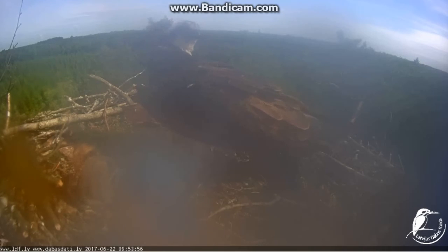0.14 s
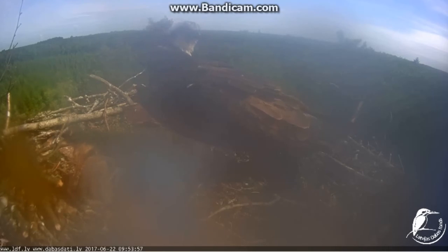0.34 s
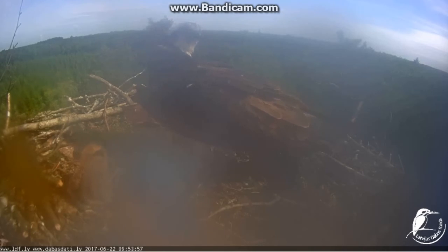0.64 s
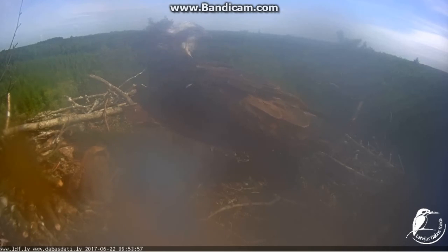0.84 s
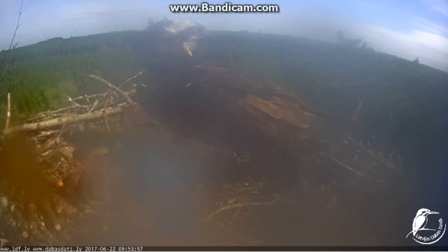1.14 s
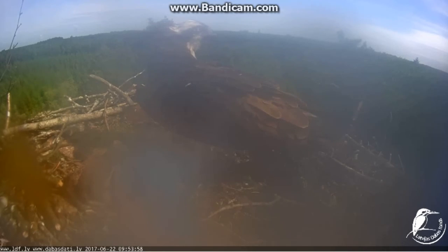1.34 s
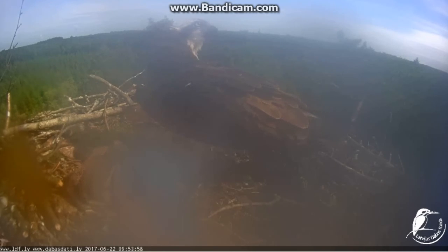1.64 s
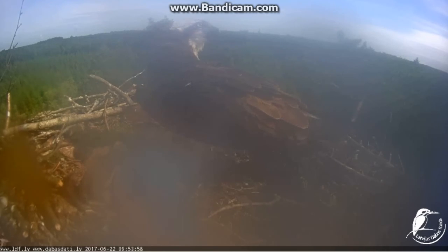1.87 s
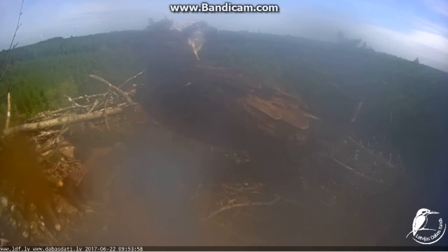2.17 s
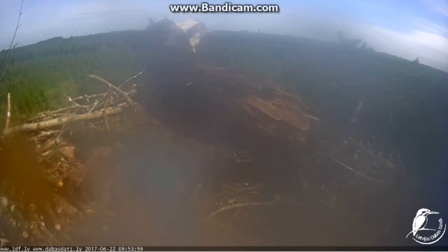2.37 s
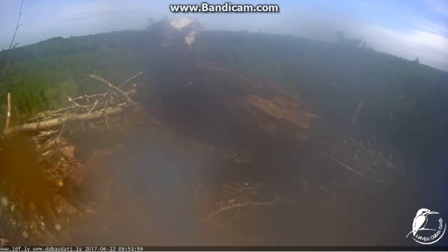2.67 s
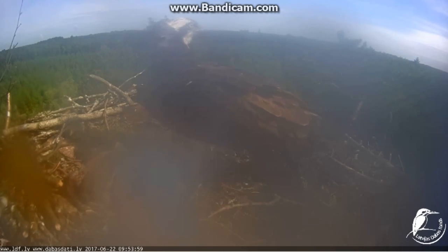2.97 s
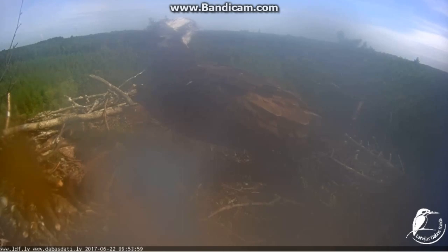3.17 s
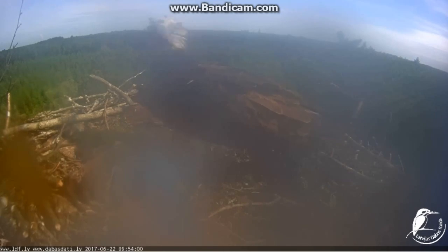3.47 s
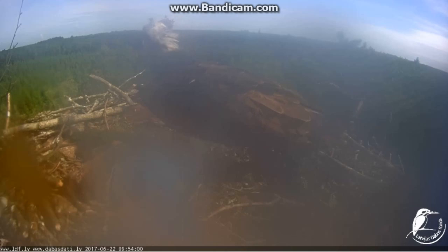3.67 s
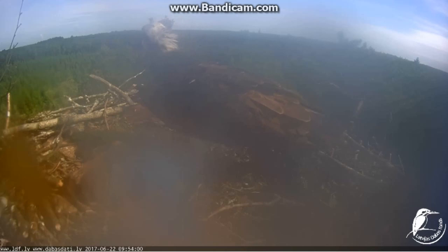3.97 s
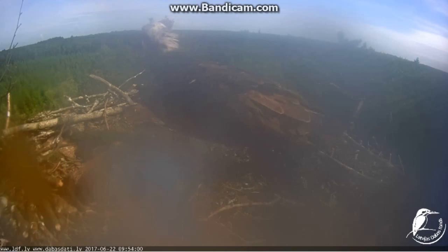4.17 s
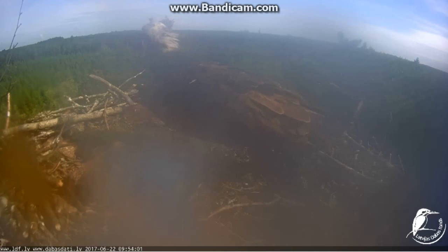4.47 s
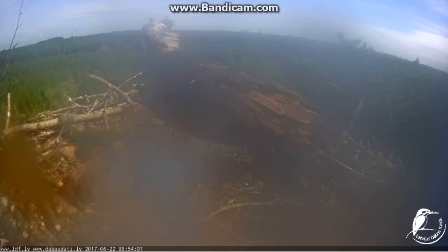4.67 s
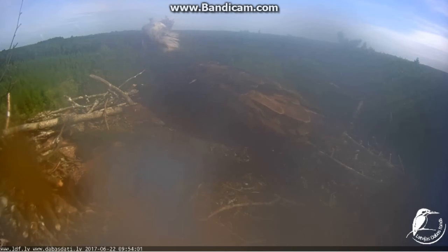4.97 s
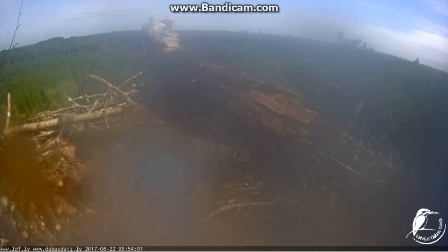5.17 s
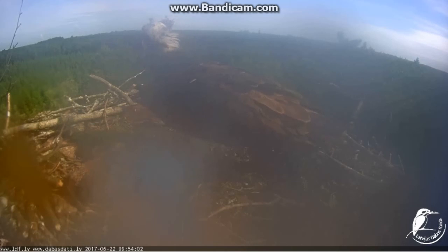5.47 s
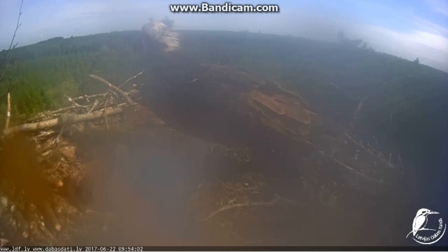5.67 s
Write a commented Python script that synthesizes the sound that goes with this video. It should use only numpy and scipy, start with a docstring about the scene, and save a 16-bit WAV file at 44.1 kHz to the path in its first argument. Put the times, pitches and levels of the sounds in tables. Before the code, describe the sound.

A quiet forest is heard from an outdoor microphone high in the trees. Light wind rumbles on it throughout, over distant air, a faint low hum and a steady hiss. Small gusts swell at about 0.6, 1.3, 3.4 and 4.1 seconds. The songbirds are faint and echo softly among the trees. One opens with four high falling sweeps in the first 0.6 seconds, then five quick chips up to 1.2 seconds. Short slurred whistles and a buzz follow, with thin, very high downward flicks from a farther bird between 2 and 3 seconds. From about 2.8 to 4.3 seconds the song thickens into overlapping twitters, whistles and brief trills, ending in lower buzzy notes around 4.7 seconds. The wind then eases, and a very faint high sizzle rises in the hiss until the end, near 5.8 seconds.

```python
"""A high nest in a forest, heard by an outdoor camera, with small songbirds singing around it.
Each note is one frequency-modulated tone: a whistle, a sweep or a fast trill. Nearby branches
reflect it, and scattering among the trees returns it as a soft echo. Light wind rumbles as its
eddies press on the microphone, over distant air, a low hum and the camera's steady hiss."""
import sys
import numpy as np
from scipy import signal
from scipy.fft import rfft, irfft
from scipy.io import wavfile

SR = 44100
rng = np.random.default_rng(int(sys.argv[2]) if len(sys.argv) > 2 else 0)


def store_pcm(level_fs):
    """Save levels as 16-bit WAV."""
    pcm = np.round(np.clip(level_fs, -1, 1) * 32767).astype(np.int16)
    wavfile.write(sys.argv[1], SR, np.atleast_2d(pcm).T)


N = 256201
TIME = np.arange(N) / SR
BINS = np.fft.rfftfreq(N, 1 / SR)

# spectra of camera hiss, distant air and wind buffeting: f/Hz, relative spectral level/dB
HISS_SPECTRUM = [(900, -8), (1400, -9.5), (1700, -7), (2000, 1), (2400, 1.5), (2800, -4), (3300, -6),
                 (4300, -8), (5200, -10), (6200, -10.5), (7500, -14), (11000, -15.5), (14000, -18),
                 (15000, -32)]
AIR_SPECTRUM = [(15, -1.5), (40, -14.5), (70, -4), (110, -8.5), (160, -11), (220, -16), (300, -16.5),
                (450, -18.5), (680, -21.5), (870, -27.5), (1300, -33), (1900, -34), (3300, -93)]
BUFFET_SPECTRUM = [(1, 4), (5, 1), (10, 7), (20, -2), (32, -8), (50, -13), (100, -21), (150, -27.5),
                   (250, -35), (600, -83)]
# faint high sizzle: t/s, level/dB
SIZZLE_LEVELS = [(4.4, -80), (5.1, -75), (5.8, -70)]
# low band of noise: t/s, level/dB, centre f/Hz, width/Hz
HUM_BAND = [(0, -60, 201, 80), (1.1, -62, 177, 80), (2.6, -65, 204, 80), (3.0, -59, 240, 91),
            (3.4, -63, 187, 80), (3.85, -56, 172, 80), (4.12, -56.5, 268, 64.6), (4.45, -57.5, 264, 140),
            (4.8, -55.5, 256, 98), (5.1, -59.5, 204, 85), (5.81, -60.5, 195, 80)]
# wind between the gusts: t/s, level/dB
BREEZE_LEVELS = [(0, -57), (.4, -43.5), (4.6, -45), (5.1, -47.5), (5.81, -50.5)]
# gusts on the microphone: t/s, half width/s, rise/dB
WIND_GUSTS = [(.64, 0.14, 5.5), (1.34, 0.23, 10), (1.88, 0.051, 2.5), (2.35, 0.11, 5), (2.91, 0.083, 6),
              (3.38, 0.056, 12), (4.07, .07, 10.5), (4.32, 0.056, 6), (4.76, 0.044, 6)]

# In the note tables, echo is the level sent into the trees relative to the note's own.
# falling sweeps that open a song: t/s, level/dB, echo/dB
SWEEP_NOTES = [(.085, -65, -6), (.238, -63, 0), (.394, -59, -5), (.554, -61, -2)]
# chips that rise, break off at the top and fall back: t/s, length/s, level/dB
CHIP_NOTES = [(0.704, 0.026, -67), (0.807, .039, -62), (0.928, 0.034, -61.5), (1.045, 0.042, -60.5),
              (1.166, .034, -61.5), (3.984, .056, -62.5), (4.161, 0.051, -61.5)]
# quick downward flicks of a farther bird: t/s, length/s, start f/Hz, level/dB
FLICK_NOTES = [(1.9, .031, 6250, -64), (2.016, 0.05, 6200, -72), (2.225, .072, 6900, -72),
               (2.685, .033, 6700, -65), (2.866, 0.028, 6750, -65), (2.953, 0.032, 6500, -64),
               (3.052, .026, 6200, -69), (3.328, .017, 3900, -70), (3.424, 0.015, 3700, -65),
               (3.635, .014, 5950, -65), (3.844, 0.02, 4100, -61)]
# bending slurs: t/s, length/s, start f/Hz, middle f/Hz, end f/Hz, level/dB, level change/dB, echo/dB
SLUR_NOTES = [(1.315, 0.023, 2694, 2500, 2440, -57, -11, -2),
              (1.341, 0.029, 2430, 2070, 1860, -56, -11, -11), (2.212, 0.1, 2150, 2417, 2230, -59, 3, -15),
              (2.966, 0.087, 2315, 2450, 2450, -56, -2, -18),
              (3.547, 0.11, 2240, 2020, 1810, -57.5, -12, -23),
              (3.551, 0.059, 4250, 3990, 3880, -61.5, -3, -4),
              (3.622, 0.043, 3810, 3050, 2220, -59, -5, -8), (4.361, 0.042, 2570, 3440, 3060, -59, 0, -3),
              (4.4, 0.031, 3036, 2644, 1960, -53.5, 2, 2)]
# held or gliding whistles: t/s, length/s, start f/Hz, end f/Hz, level/dB, echo/dB
WHISTLE_NOTES = [(0.213, 0.086, 2740, 2720, -68, -9), (.536, 0.048, 2830, 2790, -64.5, -8),
                 (0.609, 0.079, 3540, 3670, -68, 0), (0.909, 0.023, 2220, 2630, -62, -13),
                 (1.289, 0.018, 2970, 2860, -60, -8), (1.383, 0.03, 2325, 2630, -64, -6),
                 (1.422, 0.035, 2410, 2330, -66, -3), (1.461, 0.02, 2390, 2230, -62, -17),
                 (1.555, 0.046, 2300, 2500, -62, -12), (1.572, .04, 3310, 3400, -71, -10),
                 (1.924, 0.052, 3840, 4440, -62, 1), (2.183, 0.035, 1975, 2090, -60, 5.5),
                 (2.217, 0.044, 4170, 3640, -60.5, -5), (2.372, 0.067, 3530, 3740, -65, -6),
                 (2.492, .025, 2500, 2610, -61, -6), (2.63, 0.038, 6980, 6620, -66.5, 1),
                 (2.844, .011, 5480, 5420, -59.5, -8), (2.845, 0.02, 3060, 2800, -62, -6),
                 (2.892, 0.023, 2310, 2120, -60.5, -9), (3.031, 0.072, 4380, 4430, -65, 0),
                 (3.128, 0.027, 3590, 3590, -67, 1), (3.194, 0.053, 4440, 3970, -65, -2),
                 (3.243, 0.072, 4000, 3985, -65, 0.5), (3.164, .022, 5300, 5400, -63, -2),
                 (3.23, 0.018, 5450, 5350, -64, -8), (3.236, 0.019, 2580, 2355, -58.5, -16),
                 (3.254, 0.021, 2350, 2260, -60, 2), (3.35, .05, 4150, 4000, -71, 0),
                 (3.453, 0.043, 4330, 4300, -65.5, -1), (3.639, 0.018, 4040, 3900, -59.5, -3),
                 (3.941, 0.016, 2300, 3070, -58, 0), (3.956, 0.022, 2890, 2170, -60, 3),
                 (4.052, 0.032, 3630, 3634, -63.5, -3)]
# buzzes: t/s, length/s, f/Hz, frequency deviation/Hz, level/dB, level change/dB, echo/dB
BUZZ_NOTES = [(1.483, 0.095, 4284, 424, -58, -8, -11.5), (1.866, 0.048, 5890, 200, -63.5, 0, 0),
              (2.524, .066, 6200, 342, -72, 0, -2), (2.866, .038, 4120, 260, -64, -2, -2),
              (3.165, 0.099, 4300, 400, -65.5, 4, -3), (3.275, 0.1, 3270, 260, -68, -9, 3),
              (3.563, 0.077, 4320, 400, -62.5, -7, -1), (3.651, 0.034, 3310, 300, -61, 0, -2),
              (3.736, 0.035, 2794, 340, -61, -2, 4), (3.766, 0.036, 2505, 380, -59, -5, -9),
              (3.835, 0.047, 3780, 520, -62, -3, -4), (4.02, 0.019, 4010, 345, -64, 0, -8),
              (4.115, 0.049, 2560, 300, -58.5, 0, 4), (4.193, .048, 3850, 483, -62.5, -2, -5),
              (4.281, .024, 4700, 338, -64, 0, -5), (4.405, 0.054, 2980, 450, -67, -1, 0),
              (4.414, 0.062, 2510, 402, -62, -1, 0), (4.475, 0.113, 2297, 290, -56.5, 1, -4),
              (4.61, 0.113, 2385, 220, -65, 2, -1)]
# modulation rate of a buzz by its pitch: f/Hz, rate/Hz
TRILL_RATES = [(2300, 46), (2500, 90), (4300, 172), (6200, 140)]


def from_db(db):
    """Amplitude ratio: a factor of ten for every 20 dB."""
    return 10 ** (np.asarray(db) / 20)


def unit(x):
    """Normalisation to rms 1."""
    return x / np.sqrt(np.mean(x ** 2) + 1e-20)


def colour(points):
    """Amplitude spectrum, interpolated in dB over log frequency."""
    hz, db = np.transpose(points)
    return from_db(np.interp(np.log(np.maximum(BINS, 1)), np.log(hz), db))


def noise(gain):
    """Spectral shaping of white noise, at rms 1."""
    return unit(irfft(rfft(rng.standard_normal(N)) * gain, N))


def drift(rate_hz):
    """Low-pass noise: smooth random motion up to about the given rate."""
    return noise(np.exp(-(BINS / rate_hz) ** 2))


def add(mix, s, sound):
    """Superposition of a sound on the mix from time s."""
    part = mix[max(round(s * SR), 0):][:len(sound)]
    part += sound[:len(part)]


def camera_hiss(hiss_db=-57.5, sizzle_hz=5660, sizzle_width_hz=1300):
    """Stationary noise with a broad resonance just above 2 kHz; a faint high sizzle swells late on."""
    steady = from_db(hiss_db) * noise(colour(HISS_SPECTRUM))
    sizzle = noise(np.exp(-((BINS - sizzle_hz) / sizzle_width_hz) ** 2))
    return steady + from_db(np.interp(TIME, *np.transpose(SIZZLE_LEVELS))) * sizzle


def distant_hum():
    """Band-limited noise: a low rumble whose centre, width and level wander."""
    times, *columns = np.transpose(HUM_BAND)
    db, hz, width = (np.interp(TIME, times, column) for column in columns)
    window = dict(nperseg=4096, noverlap=3072)
    bins, frames, spectra = signal.stft(rng.standard_normal(N), SR, **window)
    centre, spread = np.interp(frames, TIME, hz), np.interp(frames, TIME, width)
    passband = np.exp(-((bins[:, None] - centre) / spread) ** 2) / np.sqrt(spread)
    band = signal.istft(spectra * passband, SR, **window)[1][:N]
    return from_db(db) * unit(band)


def distant_air(air_db=-50.5, sway_db=0.2, flicker_db=1.6, split_hz=400):
    """Amplitude-modulated noise: distant air sways gently and flickers in its upper register."""
    air = from_db(air_db) * noise(colour(AIR_SPECTRUM)) * from_db(sway_db * drift(5.5))
    low = irfft(rfft(air) / (1 + (BINS / split_hz) ** 4), N)
    return low + (air - low) * from_db(flicker_db * drift(27))


def wind_buffeting():
    """Turbulent pressure: slow eddies push on the microphone, in a breeze with bell-shaped gusts."""
    breeze_db = np.interp(TIME, *np.transpose(BREEZE_LEVELS))
    gust_db = sum(db * np.exp(-((TIME - s) / width) ** 2) for s, width, db in WIND_GUSTS)
    return from_db(breeze_db + gust_db) * noise(colour(BUFFET_SPECTRUM))


def forest_echo(x, t60=0.95, late_t60=1.4, late_db=-13, first_s=0.0078, stir_hz=25):
    """Reverberation: trunks and crowns scatter a quick dense echo and a faint longer one."""
    t = np.arange(SR) / SR
    taps = rng.standard_normal((2, SR)) * (rng.random((2, SR)) < .5) * (t > first_s)
    taps *= from_db(-60 * t / t60) + from_db(late_db - 60 * t / late_t60)
    one, other = (signal.fftconvolve(x, path / np.linalg.norm(path))[:N] for path in taps)
    stir = 2 * drift(stir_hz)  # shifting between two paths blurs held notes
    return one * np.cos(stir) + other * np.sin(stir)


def branch_reflections(x, count=5, reflection=0.22, leaves_db=-13, leaves_t60=.16):
    """Interference: early reflections near the nest break up each sweep; leaves add a short smear."""
    t = np.arange(SR // 5) / SR
    leaves = rng.standard_normal(len(t)) * from_db(-60 * t / leaves_t60)
    taps = from_db(leaves_db) * leaves / np.linalg.norm(leaves)
    delay_s = rng.uniform(.001, .016, count)
    taps[(delay_s * SR).astype(int)] = reflection * rng.choice([-1, 1], count)
    taps[0] = 1  # direct path
    return signal.fftconvolve(x, taps / np.linalg.norm(taps))[:N]


def syllable(s, length, contour, db, echo_db, change_db=0, dip_db=0, swing_hz=0):
    """Parameters of one modulated tone; the contour is its start, middle and end f/Hz."""
    return s, length, contour, db, echo_db, change_db, dip_db, swing_hz


def far_twitter(from_s=2.8, to_s=4.3, per_s=32, low_hz=2550, high_hz=4700):
    """Distant song, more reverberant than direct: faint falling notes, random in time and pitch."""
    for k, (when, height, slope) in enumerate(rng.random(size=(60, 3))):
        s = from_s + (k + when) / per_s
        hz = low_hz * (high_hz / low_hz) ** height
        fall = 0.105 * slope
        if s < to_s:
            yield syllable(s, 0.0311, (hz * (1 + fall), hz, hz * (1 - fall)), db=-72.5, echo_db=2.5)


def song(flick_drop_hz=1410, flick_bow_hz=114, whistle_arch=0.0078, buzz_sag=.025, buzz_bow=.02):
    """The frequency contour sets each kind of syllable apart; yields every note of the birds."""
    for s, db, echo_db in SWEEP_NOTES:
        yield syllable(s, .054, np.linspace(5440, 2755, 3), db, echo_db, dip_db=-8)
    for s, length, db in CHIP_NOTES:
        yield syllable(s, length, (2730, 3655, 2730), db, echo_db=-5, dip_db=-22)
    for s, length, hz, db in FLICK_NOTES:
        contour = (hz, hz - flick_drop_hz / 2 + flick_bow_hz, hz - flick_drop_hz)
        yield syllable(s, length, contour, db, echo_db=-8)
    for s, length, start, middle, end, db, change_db, echo_db in SLUR_NOTES:
        yield syllable(s, length, (start, middle, end), db, echo_db, change_db)
    for s, length, start, end, db, echo_db in WHISTLE_NOTES:
        middle = (start + end) / 2 * (1 + whistle_arch)
        yield syllable(s, length, (start, middle, end), db, echo_db)
    for s, length, hz, swing_hz, db, change_db, echo_db in BUZZ_NOTES:
        contour = (hz * (1 + buzz_sag), hz * (1 - buzz_bow), hz * (1 - buzz_sag))
        yield syllable(s, length, contour, db, echo_db, change_db, swing_hz=swing_hz)
    yield from far_twitter()


def songbirds(waver=0.0067, flutter_db=2.2, trill_jitter=0.09, throb=0.81, swell_db=4, edge_s=.003):
    """Frequency and amplitude modulation of one tone a note; returns direct and tree-bound sound."""
    direct, scattered = np.zeros(N), np.zeros(N)
    pitch_drift = 1 + waver * drift(120)
    flutter = flutter_db * drift(120)
    trill_clock = np.cumsum(1 + trill_jitter * drift(100.7)) / SR
    for s, length, contour, db, echo_db, change_db, dip_db, swing_hz in song():
        span = slice(round((s - edge_s) * SR), round((s + length + edge_s) * SR))
        progress = (TIME[span] - s) / length
        parabola = np.polyfit([0, .5, 1], contour, 2)
        hz = np.polyval(parabola, progress) * pitch_drift[span]
        edges = signal.windows.tukey(len(hz), min(4 * edge_s / length, 1))
        mid_note = np.exp(-((progress - .5) / .14) ** 2)
        # the low end of a sweep carries better than its top
        envelope = edges / hz * from_db(change_db * progress + dip_db * mid_note)
        # turbulent air makes far, echoing notes flutter; near ones stay smooth
        echo = from_db(echo_db)
        envelope *= from_db(flutter[span] * min(2 * echo, 1))
        if swing_hz:
            # a buzz pulses on each downward swing of pitch and swells in mid note
            trill_hz = np.interp(contour[1], *np.transpose(TRILL_RATES))
            trill_phase = 2 * np.pi * trill_hz * trill_clock[span]
            hz = hz + swing_hz * np.cos(trill_phase)
            envelope *= 1 + throb * np.sin(trill_phase)
            envelope *= from_db(swell_db * np.sin(np.pi * progress))
        note = from_db(db) * unit(envelope * np.sin(2 * np.pi * np.cumsum(hz) / SR))
        # the farther the singer, the more of its note arrives by way of the trees
        add(direct, s - edge_s, note / np.hypot(1, echo * .5))
        add(scattered, s - edge_s, note * echo)
    return direct, scattered


def scene():
    """Superposition at one microphone: birds and their echo over air, wind, hum and hiss."""
    direct, scattered = songbirds()
    birds = branch_reflections(direct) + forest_echo(scattered)
    return (birds + distant_air() + wind_buffeting() + distant_hum() + camera_hiss())[None]


def record(dry):
    """Band limiting: the camera's input rests slightly off zero and passes a low-pass filter."""
    dc_offset, cutoff_hz = .0172, 14900
    low_pass = signal.firwin(601, cutoff_hz, window=("kaiser", 8), fs=SR)
    return signal.oaconvolve(dry + dc_offset, low_pass[None], "same")


dry = scene()
out = record(dry)
store_pcm(out)
```